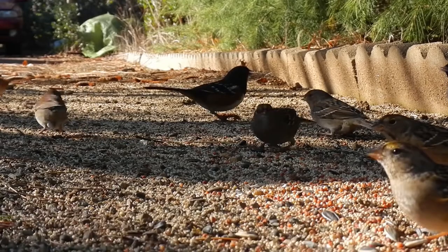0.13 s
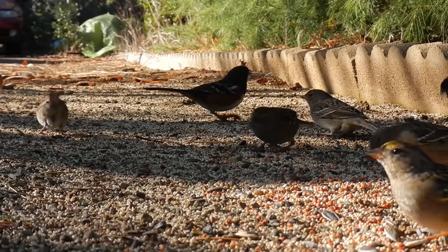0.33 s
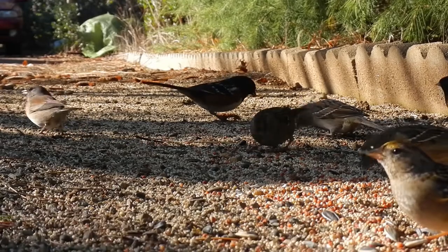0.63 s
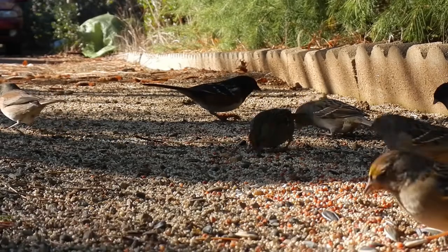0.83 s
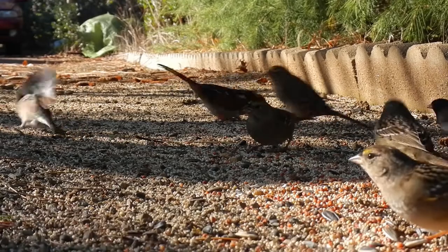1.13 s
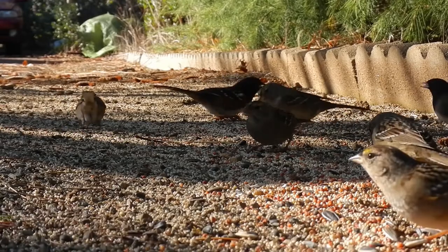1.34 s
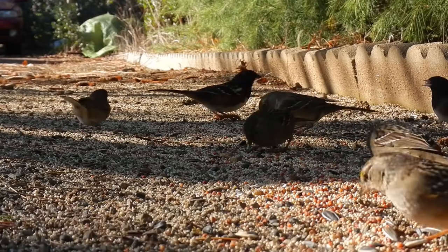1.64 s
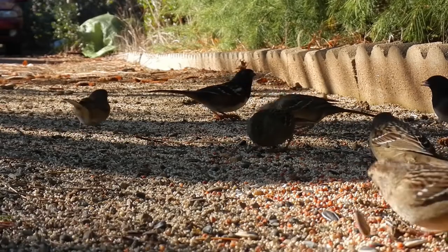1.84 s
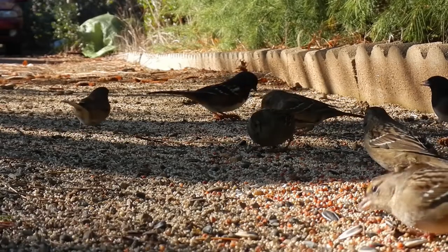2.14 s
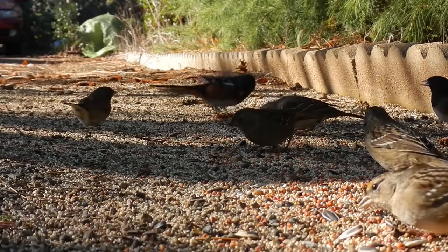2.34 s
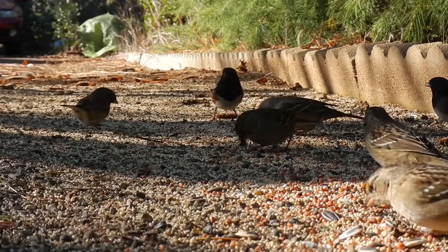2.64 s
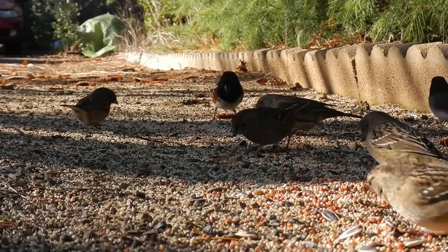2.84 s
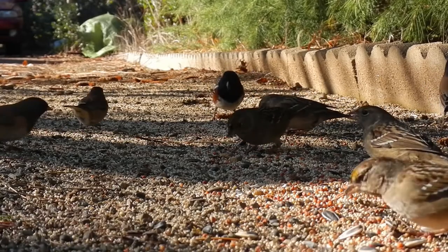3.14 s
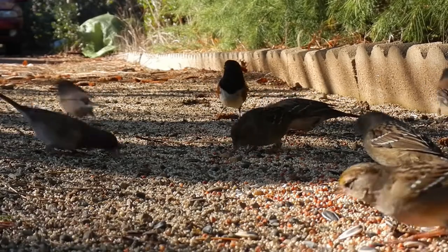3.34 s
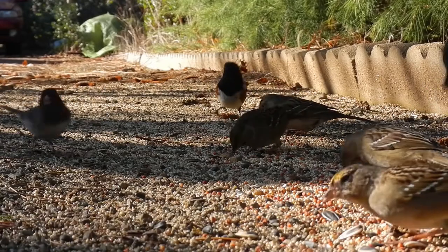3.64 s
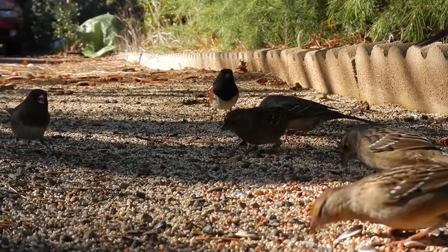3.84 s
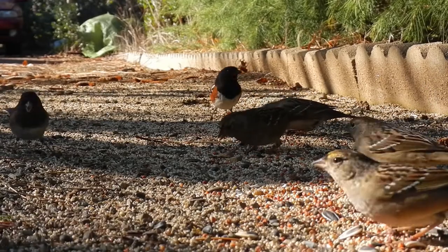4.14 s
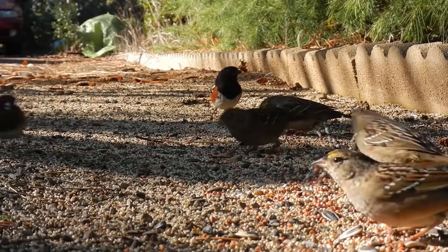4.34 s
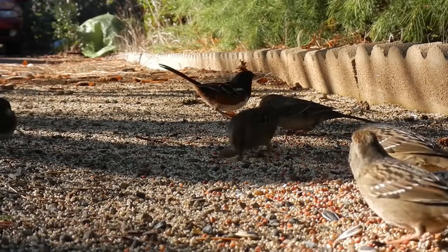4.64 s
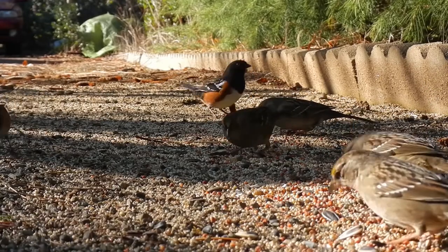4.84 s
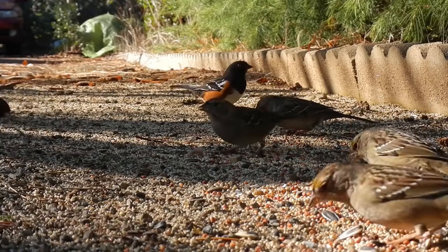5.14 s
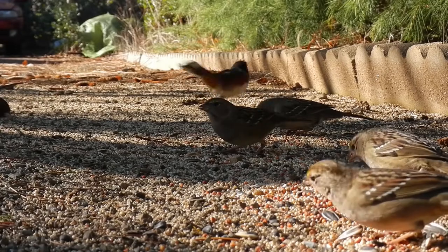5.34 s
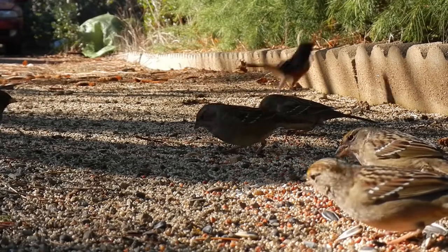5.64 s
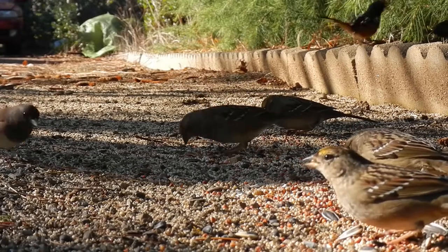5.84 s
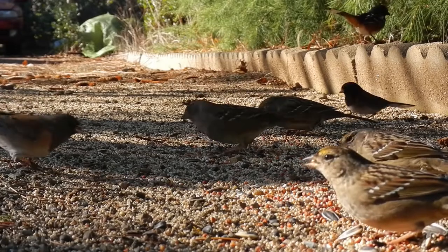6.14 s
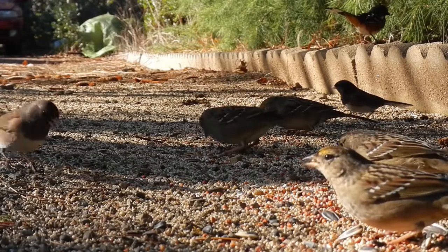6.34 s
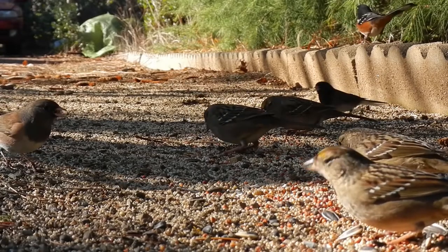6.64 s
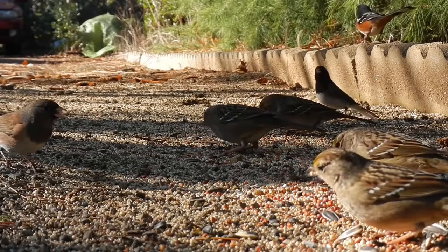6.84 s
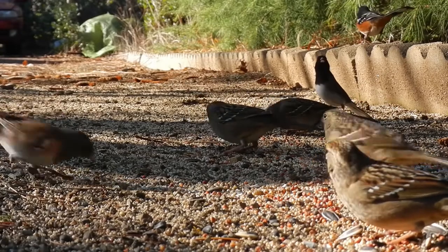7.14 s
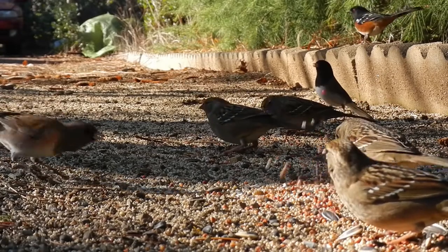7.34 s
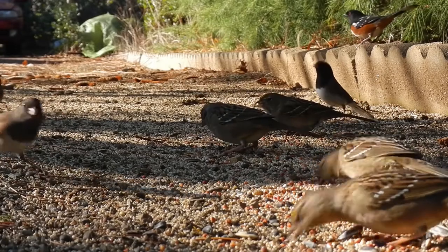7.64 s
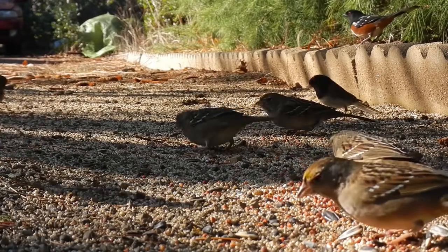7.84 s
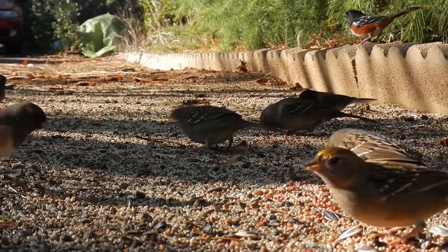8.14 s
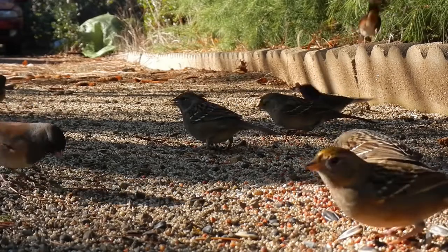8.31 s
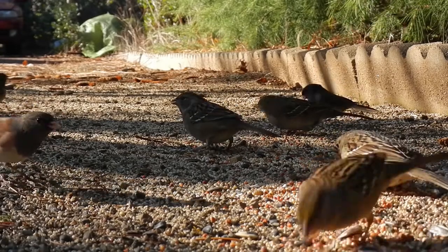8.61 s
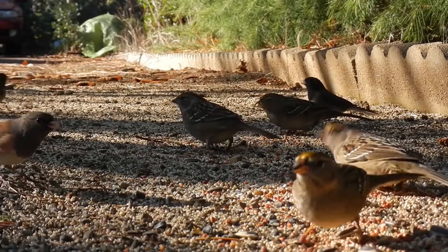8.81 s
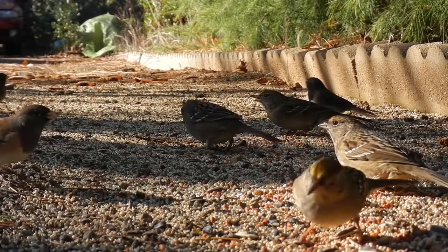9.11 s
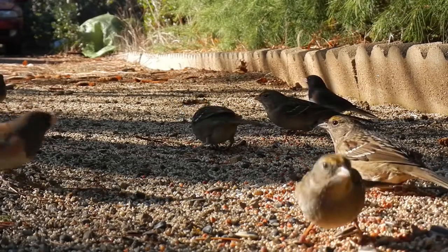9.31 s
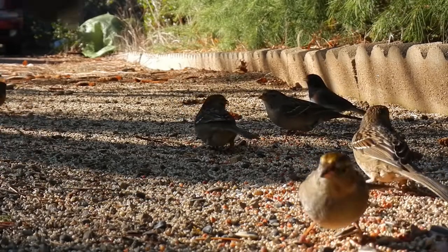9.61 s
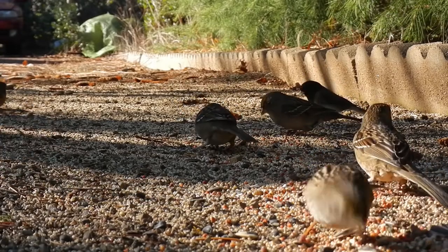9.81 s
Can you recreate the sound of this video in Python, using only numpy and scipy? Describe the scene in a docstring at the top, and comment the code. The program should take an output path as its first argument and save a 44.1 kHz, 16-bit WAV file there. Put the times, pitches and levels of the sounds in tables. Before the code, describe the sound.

A flock of small birds feeds on seed over gravel outdoors. A dense burst of beak ticks and rustling opens, then sparse scuffles. A distant bird whistles quick falling notes, thin buzzy calls answer, and cracking ticks grow frequent again toward the end. Close stereo microphone, almost no bass, with soft wavering hiss and a faint high whine.

```python
"""Small birds feed on seed strewn over gravel: beak ticks are sharp clicks that set husks and stones ringing.
Feet and wings rustle the seed: thousands of tiny random grains, louder in each scuffle.
One far bird sings falling notes (gliding sines); others give thin buzzy calls (narrow bands of noise).
Behind them lies the town hiss, shaped noise that swells and fades.
The bass is cut steeply, and a high whine wavers slightly."""
import sys
import numpy as np
from scipy import signal
from scipy.fft import rfft, irfft, next_fast_len
from scipy.io import wavfile

SR = 44100
rng = np.random.default_rng(int(sys.argv[2]) if len(sys.argv) > 2 else 0)


def wav_record(signal):
    """Record a signal, one row per channel, as 16-bit PCM in the file named by sys.argv[1]."""
    frames = np.transpose(np.atleast_2d(signal))
    bounded = np.clip(frames, -1, 1)
    # unit amplitude maps onto the largest positive 16-bit level
    quanta = np.round(bounded * 32767).astype(np.int16)
    wavfile.write(sys.argv[1], SR, quanta)


N = 439677   # length in samples, about 10 s


def amp(db):
    """Turn decibels into a gain."""
    return 10 ** (np.asarray(db) / 20)


def rms_one(x):
    """Scale a sound so that its rms (average strength) is 1."""
    return x / np.sqrt(np.mean(x ** 2) + 1e-20)


def in_time(rows):
    """Draw each column of a (time, values...) table as a curve over every sample."""
    start_s, *columns = np.transpose(rows)
    t = np.arange(N) / SR
    return [np.interp(t, start_s, column) for column in columns]


def panned(x, pan_db):
    """Make mono into stereo; a positive pan_db makes the left louder than the right."""
    return np.array([x * amp(pan_db / 2), x * amp(-pan_db / 2)])


def band(x, kind, hz, order=4):
    """Keep only some pitches, with a Butterworth filter."""
    return signal.sosfilt(signal.butter(order, hz, kind, fs=SR, output="sos"), x)


def drift(rate_hz):
    """Slow random wandering with spread 1: noise at every 50th sample, smoothed by two equal low-passes."""
    step = 50
    r = np.exp(-2 * np.pi * rate_hz * step / SR)
    noise = rng.standard_normal(N // step + 2002)
    slow = signal.lfilter([1], [1, -2 * r, r * r], noise)[2000:]   # skip the filter's start-up
    return np.interp(np.arange(N) / step, np.arange(len(slow)), rms_one(slow))


def ring(clicks, hz, t60_s):
    """Resonator: a unit click starts a sine of height 1 that dies by 60 dB in t60_s."""
    r = amp(-60 / (t60_s * SR))
    w = 2 * np.pi * hz / SR
    return signal.lfilter([0, np.sin(w)], [1, -2 * r * np.cos(w), r * r], clicks + 1e-18)


def place(out, start_s, sound):
    """Find the stretch of the output that a sound starting at start_s fills."""
    first = round(start_s * SR)
    return out[..., first:first + sound.shape[-1]]


# Beak ticks, levels before each mode's own level: start_s, stone_db, stone_hz (pitch), husk_db, snap_db,
# top_db (top of the snap), crumble_ms (scale of the splinters' spread), pan_db (left over right)
TICKS = [(0.0375, -37, 2600, -46, -29.5, -34, 2.8, -1), (0.045, -50, 2600, -47, -35, -37, 1.5, 2),
         (0.111, -56, 2600, -50, -42, -40, 1, -3), (0.133, -60, 2600, -43, -42, -30, 1.8, 1),
         (0.139, -60, 2600, -43, -46, -39, 2, -1), (0.1425, -60, 2600, -54, -44, -36, 1.2, 1),
         (0.146, -57, 2600, -49, -41, -33, 1.2, 4), (0.155, -55, 2600, -53, -43, -32, 2.2, 0),
         (0.1948, -41, 2300, -41, -53, -54, 2.4, 5), (0.2515, -59, 2600, -54, -46, -44, 1.5, 0),
         (0.2666, -58, 2600, -49, -40, -44, 1.4, 1), (0.288, -54, 2600, -50, -47, -42, 1.9, 0),
         (1.627, -60, 2600, -43, -32.5, -35, 2.5, -0.5), (1.995, -39, 2700, -50, -58, -56, 1, 0),
         (2.981, -51, 2600, -49, -42, -48, 1.0, -3), (3.341, -52, 2550, -42, -46, -48, 2.34, 1),
         (3.7, -56, 2600, -59, -40.5, -49, 1.2, -2), (3.9218, -27.5, 2650, -53, -31.5, -30, 1.1, -3.5),
         (4.0939, -52, 2600, -49, -40, -45, 1.1, -6), (4.4393, -40, 2500, -52, -53, -57, 2.5, 1),
         (4.567, -58, 2600, -56, -45, -50, 1, -5), (4.6125, -55, 2600, -57, -41, -43, 2.4, -3),
         (5.594, -32, 2750, -43, -42, -35, 2.4, 2), (6.0692, -38, 2450, -41, -39, -31, 1.4, -4),
         (6.2381, -33, 2310, -48, -32, -37, 1.8, 0), (6.272, -60, 2600, -62, -41, -52, 1.5, -1),
         (6.6198, -31.5, 2290, -57, -40.5, -38, 1.1, 0), (7.343, -62, 2600, -34, -53, -49, 0.85, 3),
         (7.3876, -32.5, 2790, -58, -38, -40, 1.6, 1), (7.8225, -60, 2600, -58, -44, -50, 1.5, 0),
         (7.899, -30, 2500, -39, -57, -63, 0.68, 0), (8.23, -60, 2600, -58, -44, -44, 1.5, -2),
         (8.234, -43, 3300, -44, -40, -43, 1.2, 2), (8.5652, -37, 2900, -41, -48, -47, 0.63, 1),
         (8.595, -41, 2700, -56, -41, -49, 2, 0), (8.786, -44, 2350, -54, -48, -55, 2.5, -3),
         (8.8625, -38, 2800, -57, -42, -46, 2.5, -3), (9.1888, -45, 3000, -42, -30.5, -33, 4.2, 4),
         (9.225, -62, 2600, -56, -40, -46, 3.2, 1), (9.2295, -60, 2600, -58, -41, -44, 3.5, 1),
         (9.3168, -30, 2280, -54, -39, -40, 2.1, -2), (9.435, -33.5, 2300, -48, -45, -49, 1.2, 0)]
# What a tick rings with, one list each for stone, husk, snap and top of the snap:
# pitch (stone: ratio to stone_hz; others: Hz), level_db, t60_s (time to die by 60 dB)
TICK_MODES = [
    [(0.8, 0, .0045), (1.0, 3, .006), (1.25, 0, .004), (1.55, -4, .003)],
    [(4670, 4, 0.0056), (5540, -2, .002), (6900, 2, 0.0016)],
    [(8700, -8, .0016), (10200, -3, 0.0058), (11280, 2, 0.0091)],
    [(13500, 8.5, 0.0024), (14500, 6, 0.0027)],
]


def ticks():
    """Each tick is one sharp blow; splinters of the crumbling husk scatter round it, reaching stone weakly."""
    out = np.zeros((2, N))
    lead, size = 128, 1024   # samples: room before the blow, whole tick
    part_reach = (.25, .6, 1, 1)   # how strongly splinters strike stone, husk, snap and top
    for start_s, stone_db, stone_hz, husk_db, snap_db, top_db, crumble_ms, pan_db in TICKS:
        spread = rng.beta(2, 3, 20) * 1.6 - .5   # some splinters come before the blow
        splinter_at = lead + (crumble_ms / 1000 * SR * spread).astype(int)
        share = 0.022 * crumble_ms ** 2   # a longer crumble puts more of the force into the splinters
        part_levels = (stone_db, husk_db, snap_db, top_db)
        pitch_units = (stone_hz, 1, 1, 1)
        tick = 0
        for modes, part_db, unit, reach in zip(TICK_MODES, part_levels, pitch_units, part_reach):
            for pitch, level_db, t60_s in modes:
                hz = pitch * unit
                clicks = np.zeros((2, size))
                clicks[:, splinter_at] = reach * share * rng.normal(0, 1, 20)
                blow = amp(rng.normal(0, 1.5, 2)) / (1 + reach * share)
                clicks[[0, 1], [lead + 1, lead]] = blow   # the left port hears it one sample later
                # each mode keeps to its own band
                rung = band(ring(clicks, hz, t60_s), "band", [hz / 1.3, hz * 1.3], order=1)
                tick = tick + amp(part_db + level_db) * rung
        place(out, start_s - lead / SR, tick)[:] += tick * panned(np.ones(1), pan_db)
    return out


# Faint stir of the whole flock under the scuffles: start_s, level_db (bright grains, before a small waver)
STIR = [(0.0, -44.5), (0.35, -59), (2.0, -60.5), (3.2, -64.5), (3.7, -55.5), (4.2, -62), (4.7, -60.5),
        (6.5, -63.5), (6.9, -61.5), (8.5, -64.5), (9.1, -56.5), (9.97, -59)]
# Hops, scratches and wing flicks in the seed: loudest_s, length_s, level_db (bright grains at the peak),
# body_db (duller body relative to the bright grains), pan_db (left over right)
SCUFFLES = [(0.025, 0.049, -32, -3, -2.5), (0.037, 0.016, -36, -9, -2), (0.056, 0.13, -44.5, -3.5, -0.5),
            (0.1, 0.12, -44.5, -7, -0.5), (0.136, 0.1, -40.5, -7.5, -0.5), (0.197, 0.08, -48, -7, -0.5),
            (0.283, 0.21, -50.5, -6, 0), (0.42, .07, -51, -4.5, -2), (0.663, .12, -60.5, -4, 0.5),
            (0.797, 0.2, -54.5, -3.5, -1.5), (0.966, 0.097, -53.5, -7, -1), (1.136, 0.23, -54, -5, 0),
            (1.268, 0.21, -55, -2.5, 0.5), (1.537, .1, -56.5, -3, 0), (1.628, 0.091, -53, -6, 3.5),
            (1.778, 0.32, -54, -1.5, -1), (1.942, 0.23, -55, -9, -1.5), (2.204, 0.3, -57, -8.5, 0.5),
            (2.544, 0.077, -53, -7, -3), (2.913, 0.12, -53.5, -16, -1.5), (3.502, 0.042, -53, -8, 0),
            (3.586, .12, -52, -12, -2), (3.921, 0.085, -52, -21, -1), (4.087, 0.073, -51, -18, -2),
            (4.304, 0.068, -46, -9.5, -1), (4.33, 0.033, -49, -10, 4), (4.349, 0.14, -47.5, -10, -0.5),
            (4.423, 0.41, -53, -0.5, 0.5), (4.567, 0.25, -54, -5, 0), (5.675, 0.34, -57.5, -11.5, 4),
            (5.935, 0.38, -61, -12, -5), (6.067, 0.065, -51.5, -0.5, 4), (6.234, 0.045, -45.5, -5.5, -3.5),
            (6.573, 0.034, -51, -11, -4), (7.158, 0.11, -54.5, -3, 1), (7.242, 0.12, -47.5, -3, -2),
            (7.357, 0.19, -49.5, -3, -.6), (7.824, 0.6, -58.5, -2, -2), (8.236, 0.055, -57, -4, -8),
            (8.614, 0.11, -54.5, -5.5, -3), (8.782, 0.22, -49.5, -4.5, -0.5),
            (8.857, 0.046, -43.5, -12, -2.5), (8.882, 0.09, -46, -9, -2.5), (8.95, 0.085, -56, -9, 1),
            (9.189, 0.061, -40.5, -13.5, 1), (9.235, 0.065, -47, -17, 4), (9.53, 0.26, -52.5, -4.5, -2.5),
            (9.64, 0.11, -46.5, -8, -2.5), (9.868, 0.092, -64, -8, 1)]


def scuffle_gains():
    """Add the power of the slowly changing stir and each scuffle's swell; give bright and body gains."""
    stir_db, = in_time(STIR)
    bright_power = panned(amp(stir_db + 1.5 * drift(9.5)), -0.7) ** 2
    body_power = bright_power * amp(2 * -7.5)   # the stir's body is 7.5 dB softer
    for loudest_s, length_s, level_db, body_db, pan_db in SCUFFLES:
        begin_s = loudest_s - 0.38 * length_s   # share of the length spent rising
        end_s = begin_s + length_s
        start_s = max(begin_s, 0)
        t = np.arange(start_s, end_s, 1 / SR)
        swell = np.interp(t, [begin_s, loudest_s, end_s], [0, 1, 0])
        power = panned(amp(level_db) * swell, pan_db) ** 2
        place(bright_power, start_s, power)[:] += power
        place(body_power, start_s, power)[:] += power * amp(2 * body_db)
    return np.sqrt(bright_power), np.sqrt(body_power)


def rustle():
    """Dense clumped grains of seed, partly shared by the ports: a bright part peaking near 10.5, 13.7 and 15.2
    kHz, and a duller body."""
    bright_gain, body_gain = scuffle_gains()
    grains_per_s = 9000 * amp(2.5 * drift(40))
    born = rng.random((3, N)) < grains_per_s / SR
    grain_db = 3.5 * np.minimum(rng.exponential(1, (3, N)), 4.3)
    grains = born * amp(grain_db) * rng.choice([-1, 1], (3, N))
    grains = grains * amp(1.2 * drift(90))   # kicked seed comes in clumps
    shared = np.array([np.roll(grains[2], 2), grains[2]])   # left hears it two samples later
    grains = 0.22 * shared + grains[:2]
    bright = ring(grains, 10560, 0.0013)
    bright = bright - amp(-4.0) * ring(grains, 13700, 0.0016)
    bright = bright + amp(-5.5) * ring(grains, 15200, 0.0021)
    body = rms_one(band(grains, "band", [2200, 7400], order=3))
    body = body + amp(-9.0) * rms_one(ring(grains, 6700, 0.0017))
    return bright_gain * rms_one(bright) + body_gain * rms_one(body)


# Falling song notes in three phrases, levels before flutter and echoes: start_s,
# held_share (part of the note spent near the top), bottom_hz, opening_db, glide_db
SONG = [(1.939, 0.15, 4060, -59, -49), (2.055, 0.35, 4280, -53, -46.5), (2.18, 0.18, 4110, -53, -50),
        (2.307, 0.23, 4000, -56.5, -46.5), (2.433, .1, 3980, -49.5, -49), (2.568, 0.48, 4030, -66, -50.5),
        (4.52, .65, 4500, -56.5, -48.5), (4.671, 0.44, 4190, -54.5, -54.5), (4.79, .3, 3910, -52.5, -48.5),
        (4.919, 0.22, 3770, -57, -47), (5.062, 0.091, 3950, -64, -51), (8.269, 0.43, 4560, -56.5, -49.5),
        (8.524, 0.37, 4390, -57, -47), (8.652, .45, 4100, -57, -48)]


def song():
    """Whistles linger near their top pitch, then plunge; early echoes fray them and the yard adds a tail."""
    out = np.zeros(N)
    note_s, top_hz = .042, 6090
    sag = .12   # share of the fall that runs evenly through the whole note
    for start_s, held_share, bottom_hz, opening_db, glide_db in SONG:
        u = np.linspace(0, 1, int(note_s * SR))   # progress through the note
        plunge = ((u - held_share) / (1 - held_share)).clip(0) ** 1.1
        fall = sag * u + (1 - sag) * plunge
        hz = top_hz + (bottom_hz - top_hz) * fall
        # the glide is faint at first, peaks, then thins
        gap_db = (opening_db + glide_db) / 2 - 7
        level_db = np.interp(hz, [4000, 4950, 5500, 5900], [glide_db - 4, glide_db + 3.0, gap_db, opening_db])
        fade = np.sin(np.pi * u).clip(0) ** 0.24
        note = amp(level_db) * fade * np.sin(2 * np.pi * np.cumsum(hz) / SR)
        place(out, start_s, note)[:] += note
    out = out * amp(4 * drift(90).clip(-3, 1.2) - 1)   # the air between makes the notes flutter
    wall_echoes = [(.008, -9), (.017, -15)]   # delay_s, level_db
    out = out + sum(amp(db) * np.roll(out, round(delay_s * SR)) for delay_s, db in wall_echoes)
    t = np.arange(SR // 2) / SR
    tail_gain = amp(-30 - 60 * t / 0.07) + amp(-37 - 60 * t / 1.2)   # a short tail and a long faint one
    echoes = rng.standard_normal((2, len(t))) * tail_gain
    return panned(out, 0.92) + signal.fftconvolve(out[None], echoes, axes=1)[:, :N]


# Buzzy calls: start_s, length_s, pitch_hz, width_hz, level_db (main band before the fade),
# pan_db (left over right)
BUZZ = [(0.623, 0.12, 9440, 1200, -53.5, -5.5), (2.392, 0.088, 7040, 600, -62, 2),
        (2.468, 0.12, 6800, 302, -58.5, -1), (2.558, 0.063, 6160, 200, -56.5, -4),
        (2.644, 0.072, 6700, 250, -60.5, 0), (2.737, 0.087, 6780, 250, -61, -0.5),
        (3.485, 0.051, 6840, 400, -51, -2), (3.522, 0.06, 6670, 200, -49, 0),
        (3.573, 0.088, 6800, 150, -57, -1), (4.498, 0.031, 6140, 252, -61, -3),
        (5.694, 0.14, 6760, 251, -52.5, 4.5), (5.733, 0.05, 6700, 120, -46, 8),
        (5.8, 0.041, 6900, 151, -58, 4), (6.066, 0.15, 6200, 290, -61.5, -3),
        (6.85, 0.078, 7500, 1200, -57, 1.5), (6.93, 0.065, 6600, 202, -60.5, 5),
        (7.02, 0.064, 6740, 200, -59, 1), (7.11, 0.064, 6800, 300, -59, 0),
        (7.198, 0.16, 6900, 600, -51, 0), (7.762, 0.092, 5720, 204, -55, 1),
        (8.047, 0.12, 5930, 201, -55.5, 3), (8.271, 0.086, 6100, 250, -59, -1),
        (8.348, 0.038, 6040, 300, -60, -1), (8.406, 0.047, 6200, 300, -58.5, -2),
        (9.785, 0.1, 6280, 400, -59, 3)]


def buzzes():
    """Far rough calls: two narrow noise bands, each port hearing its own echoes as partly separate noise."""
    out = np.zeros((2, N))
    for start_s, length_s, pitch_hz, width_hz, level_db, pan_db in BUZZ:
        # below -57.5 dB the upper band loses 2.2 dB more for each dB that the call is softer
        upper_db = -8 + 2.2 * min(level_db + 57.5, 0)
        u = np.linspace(0, 1, int(length_s * SR))
        noise = rng.standard_normal((3, SR // 4))
        noise = 0.3 * noise[2] + noise[:2]   # some noise is shared by the ports
        call = 0
        for centre_hz, gain in ((pitch_hz, 1), (pitch_hz * 1.12, amp(upper_db))):
            edges_hz = [centre_hz - width_hz / 2, centre_hz + width_hz / 2]
            narrow = band(noise, "band", edges_hz, order=2)
            call = call + gain * rms_one(narrow)[:, -len(u):]
        fade = np.sin(np.pi * u ** 0.43).clip(0) ** 0.74
        call = call * panned(amp(level_db) * fade, pan_db)
        place(out, start_s, call)[:] += call
    return out


# Town hiss before its fast waver and the bass cut: start_s, level_db, low_db (extra for its low end)
TOWN = [(0.0, -52, 2), (0.42, -55, 5), (0.84, -51, -1.5), (1.25, -51.5, 1), (1.95, -47.5, -2.5),
        (2.5, -50.5, 0), (2.92, -50, -2.5), (3.28, -54, 1.5), (3.58, -46.5, 4), (3.79, -51, 4.5),
        (4.88, -55, 3.5), (5.19, -51, 3), (5.82, -60, 6), (6.9, -58.5, 3.5), (7.5, -59.5, 1.5),
        (8.75, -49, -8.5), (9.24, -54, -3.5), (9.56, -51, -3), (9.96, -57, 0.5)]
# Colour of the air at the two ports, before overall scaling: pitch_hz, left_db and right_db (dB per Hz,
# relative), alike (left-right likeness, 0 to 1)
AIR = [(690, -1.5, -3.5, 0.32), (1280, -2, -5, 0.76), (1880, 2.5, 0, 0.85), (2220, -1.5, -5, 0.79),
       (3130, -8.5, -10, 0.65), (4200, -11.5, -13.5, 0.51), (5200, -13, -14, 0.71),
       (7700, -16, -16.5, 0.038), (9200, -18, -16.5, 0.21), (11400, -19.5, -16.5, 0.088),
       (12700, -22, -22.5, 0.042), (13500, -22.5, -16.5, 0.63), (15600, -24, -22.5, 0.63)]


def air():
    """Stereo noise in the colour of the air; the two lower parts swell with the town, the top wavers slightly."""
    size = next_fast_len(N)
    hz = np.maximum(np.arange(size // 2 + 1) * SR / size, 1)
    points_hz, *columns = np.transpose(AIR)
    left_db, right_db, alike = (np.interp(np.log(hz), np.log(points_hz), c) for c in columns)
    alike = np.clip(alike, 0, 1)
    one, two = rfft(rng.standard_normal((2, size)))
    early = np.exp(2j * np.pi * hz * 4e-5)   # the air reaches the right port 40 microseconds first
    right = alike * one * early + np.sqrt(1 - alike ** 2) * two
    both = np.array([one * amp(left_db), right * amp(right_db)])
    town_share = 1 / (1 + (hz / 2684) ** 4)   # the town's swells are heard below about 2684 Hz
    low_share = 1 / (1 + (hz / 1800) ** 8)   # its low end lies below about 1800 Hz
    town = both * np.sqrt(town_share)
    high = both * np.sqrt(1 - town_share)
    low, middle, high = irfft([town * low_share, town * (1 - low_share), high], size)[..., :N]
    level_db, low_db = in_time(TOWN)
    scale = 1 / np.sqrt(np.mean((low + middle) ** 2))
    high_gain = amp(-49.5 + .7 * drift(4))
    town_gain = amp(level_db + 1.3 * drift(22))
    return scale * (town_gain * (middle + amp(low_db) * low) + high_gain * high)


def scene():
    """Add up all sources at the two microphone ports."""
    return ticks() + rustle() + song() + buzzes() + air()


# Whine before its waver, one value per port: left_db, right_db (rms)
WHINE_LEVELS = [-61.5, -55]


def record(dry):
    """Two filters cut the bass, a slightly wavering whine and very faint low hiss join, then the top is cut."""
    bass_cut = signal.ellip(6, 1, 40, 790, "high", fs=SR, output="sos")
    wet = signal.sosfilt(bass_cut, band(dry, "high", 1576, order=6))
    tone = np.sin(2 * np.pi * 14835.3 * np.arange(N) / SR)
    whine_gain = np.sqrt(2) * amp(WHINE_LEVELS)[:, None]   # root 2 turns rms into sine height
    whine = whine_gain * amp(1.1 * drift(12)) * tone
    low_hiss = band(amp(-77.5) * rng.standard_normal(N), "low", 720)
    hiss = low_hiss * np.array([[1], [-1]])   # opposite in sign at left and right
    top_cut = signal.ellip(10, .5, 80, 15800, fs=SR, output="sos")
    return signal.sosfilt(top_cut, wet + whine + hiss)


dry = scene()
out = record(dry)
wav_record(out)
```